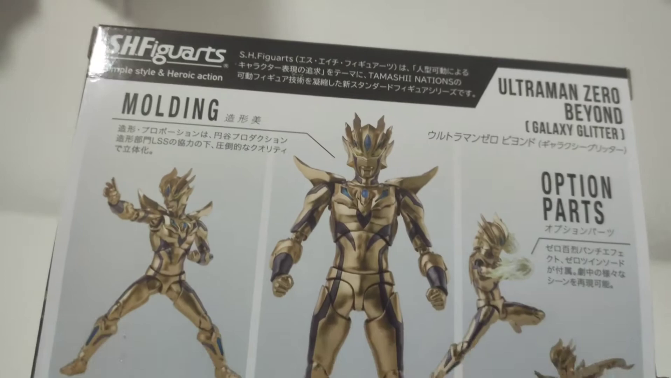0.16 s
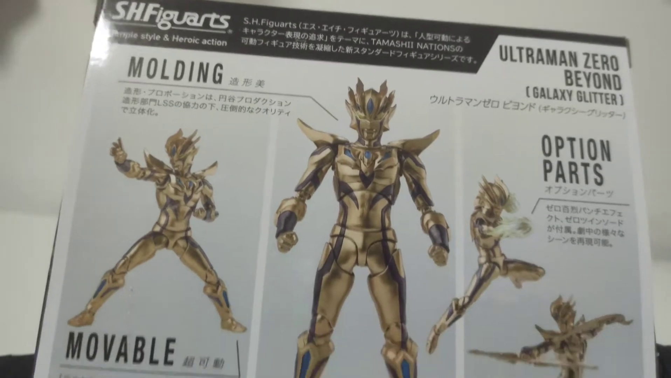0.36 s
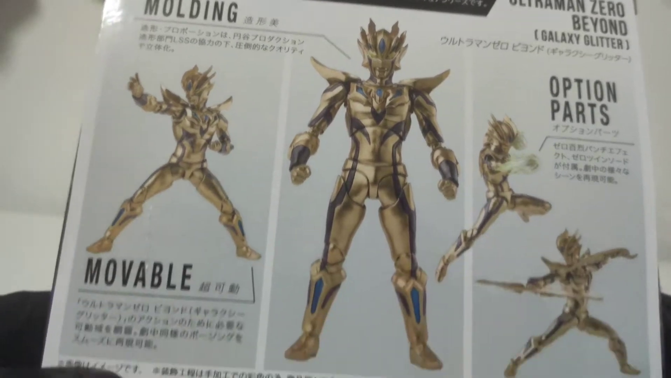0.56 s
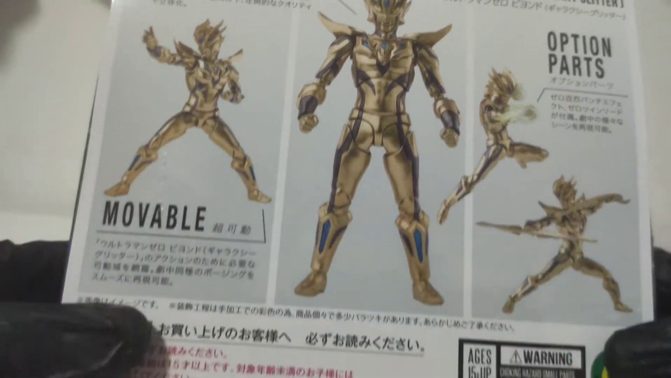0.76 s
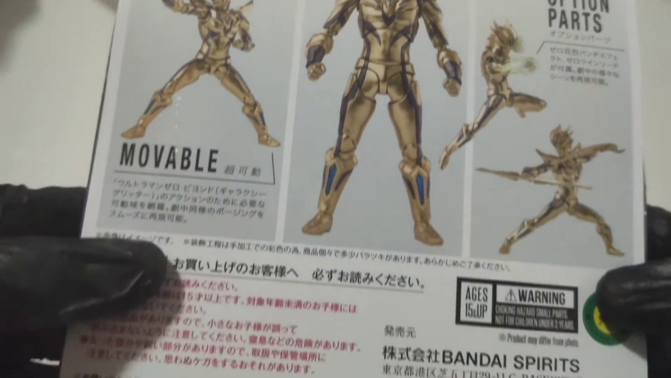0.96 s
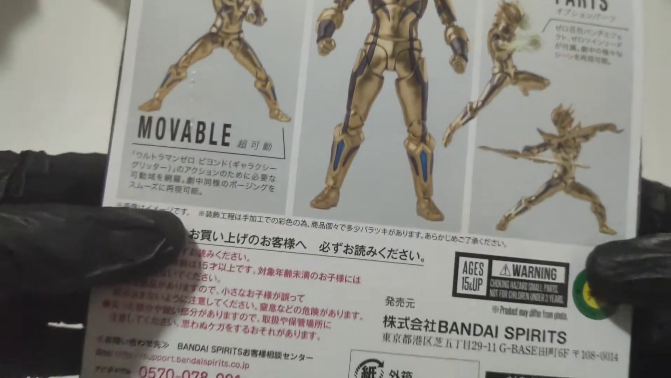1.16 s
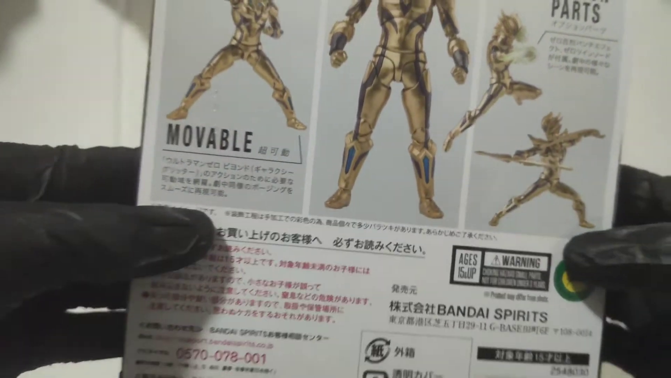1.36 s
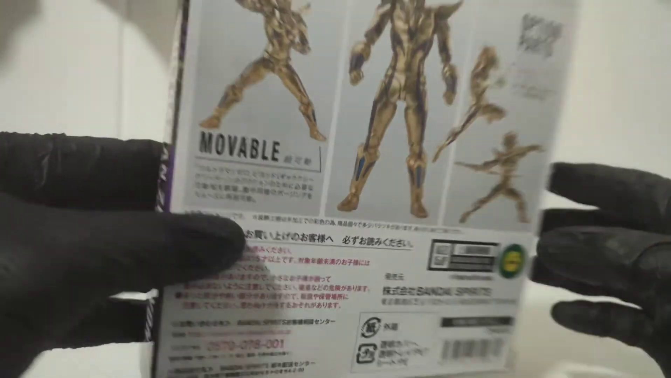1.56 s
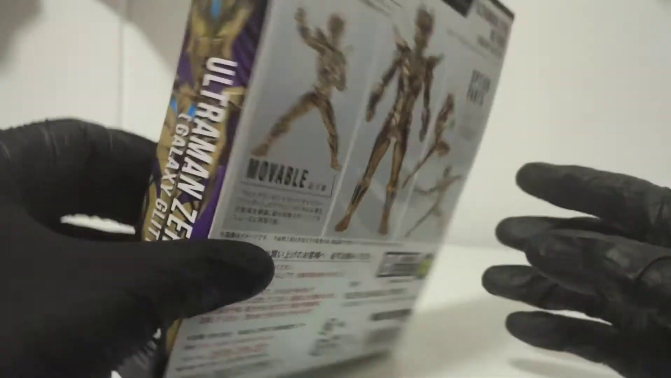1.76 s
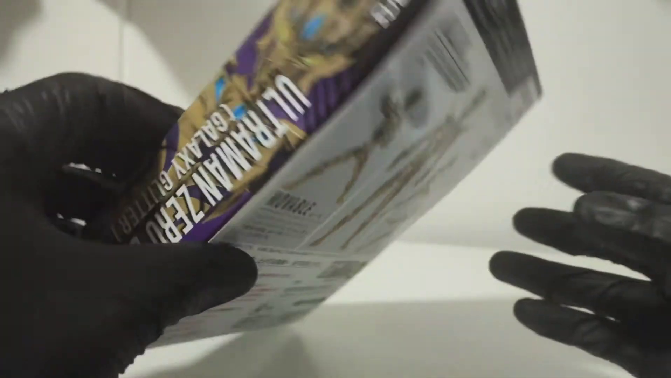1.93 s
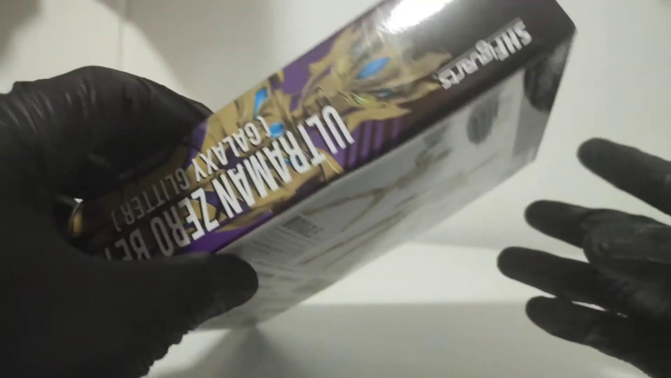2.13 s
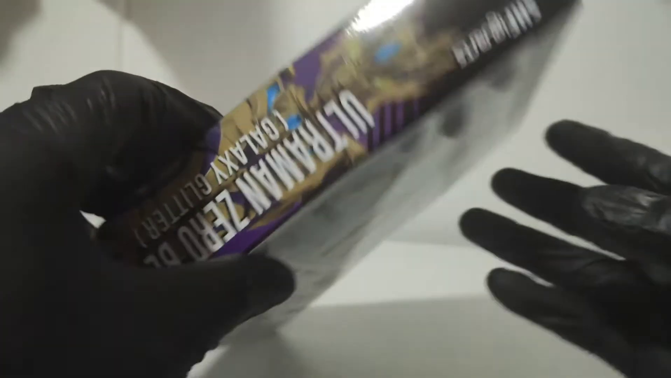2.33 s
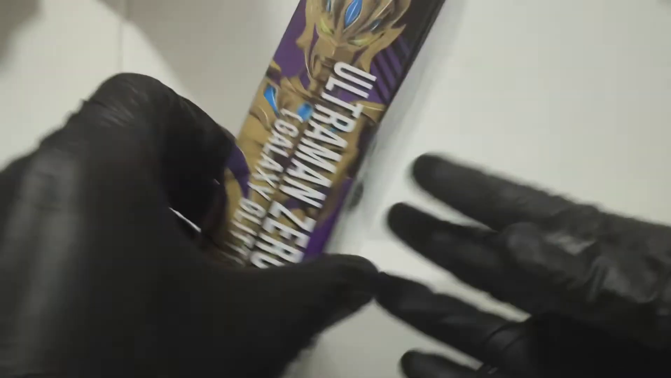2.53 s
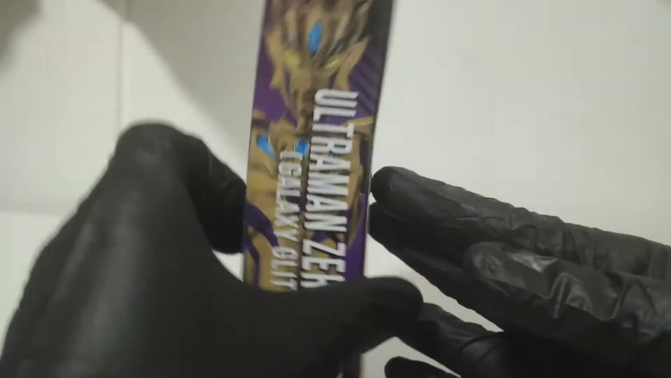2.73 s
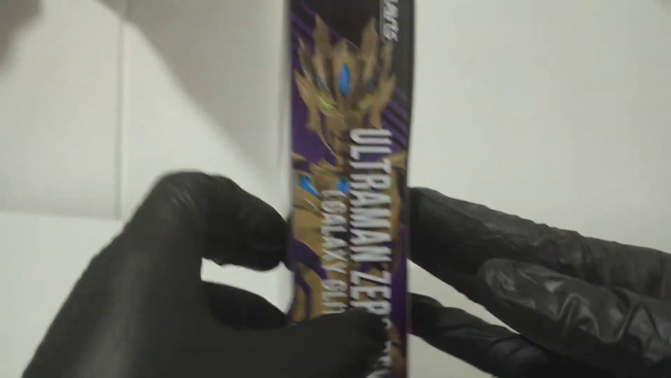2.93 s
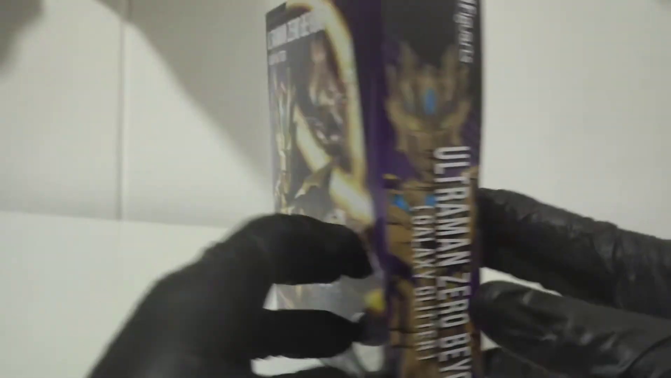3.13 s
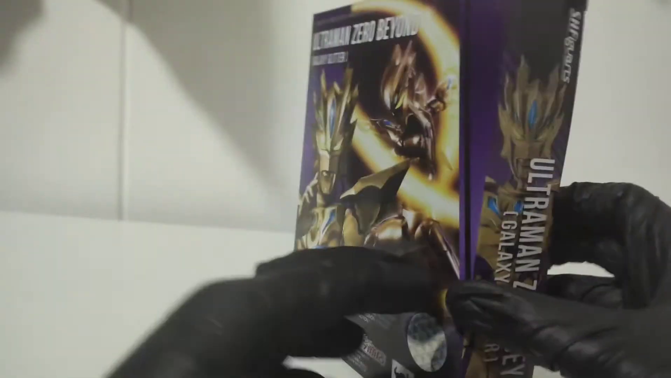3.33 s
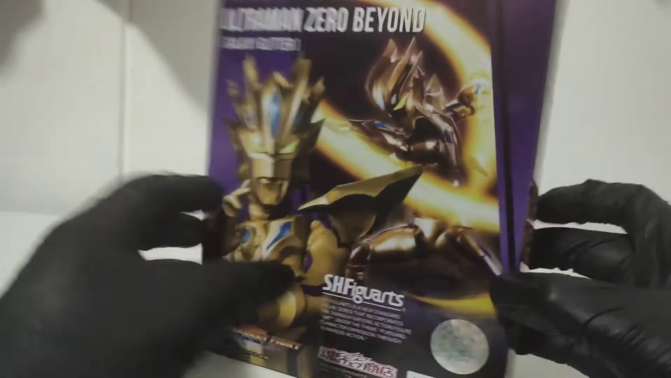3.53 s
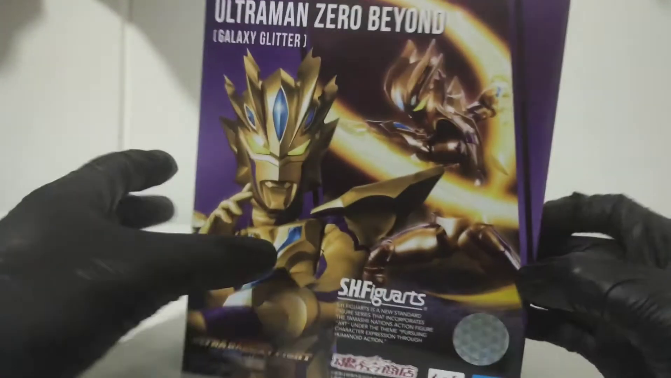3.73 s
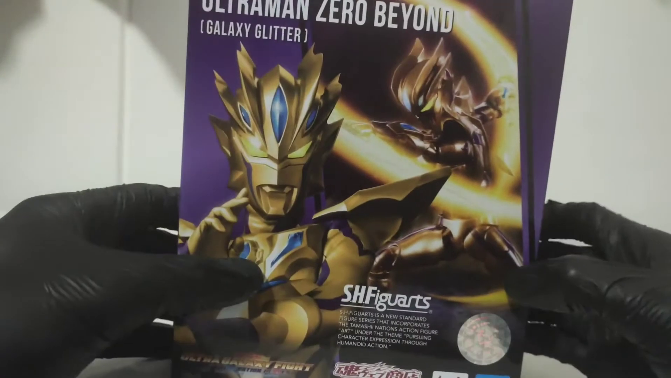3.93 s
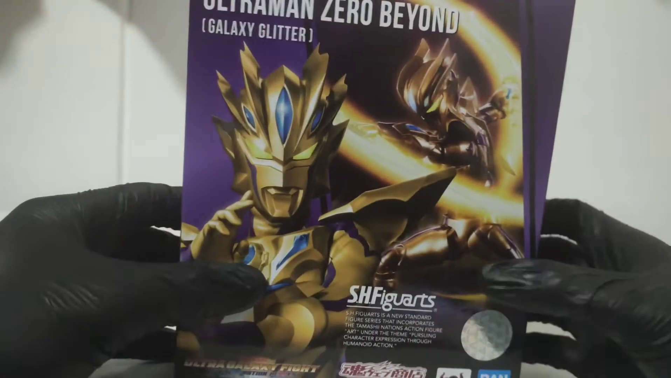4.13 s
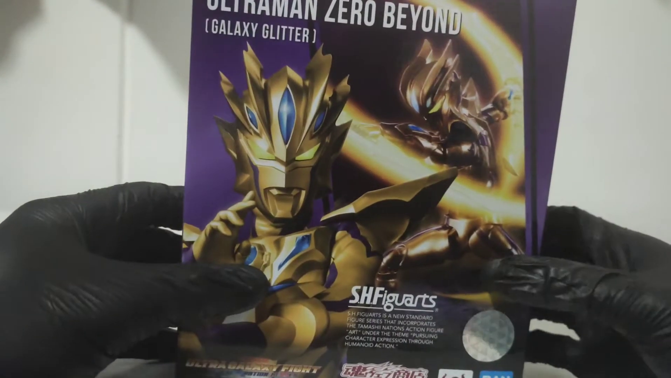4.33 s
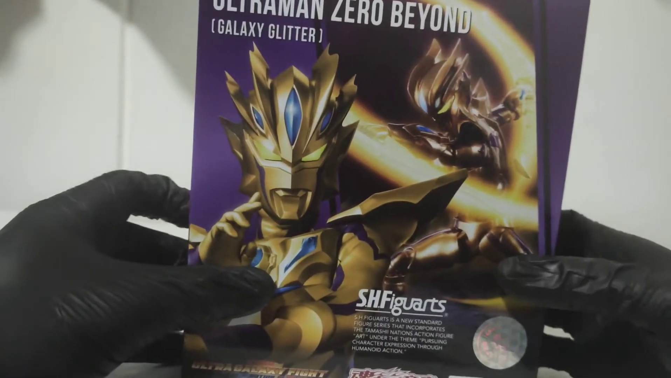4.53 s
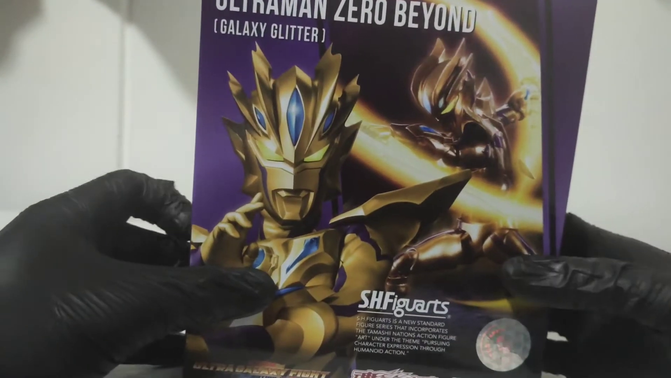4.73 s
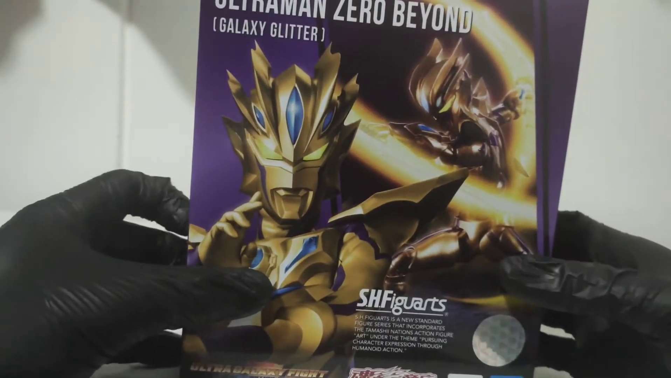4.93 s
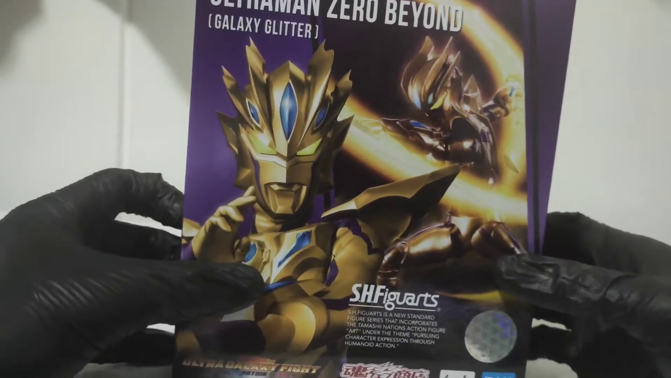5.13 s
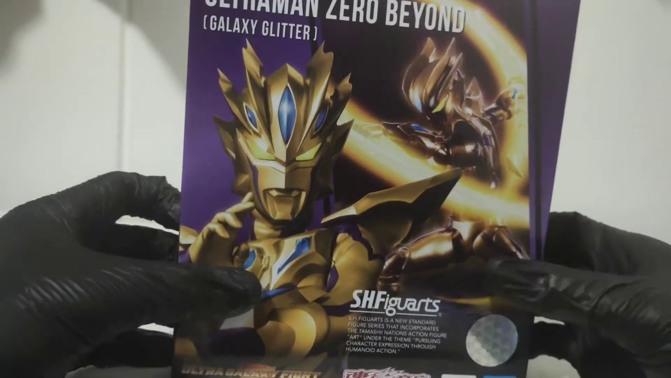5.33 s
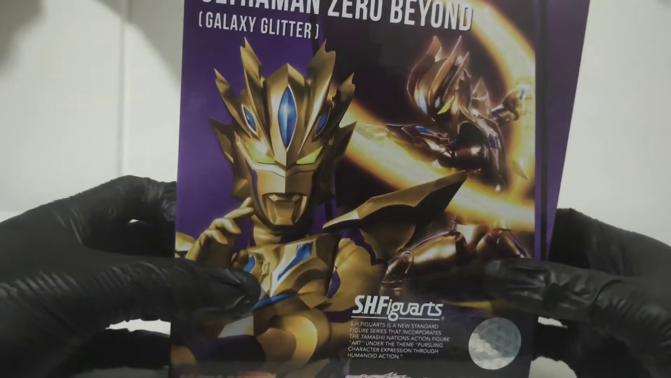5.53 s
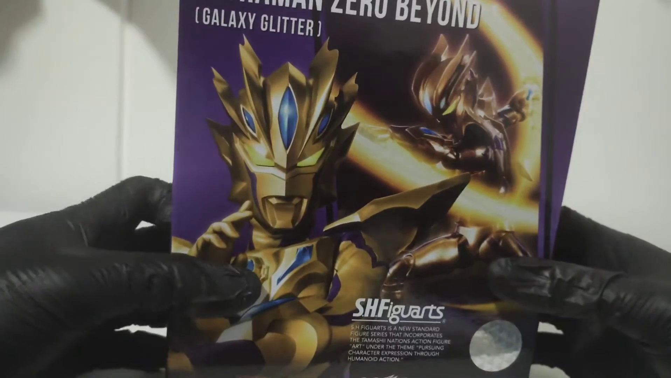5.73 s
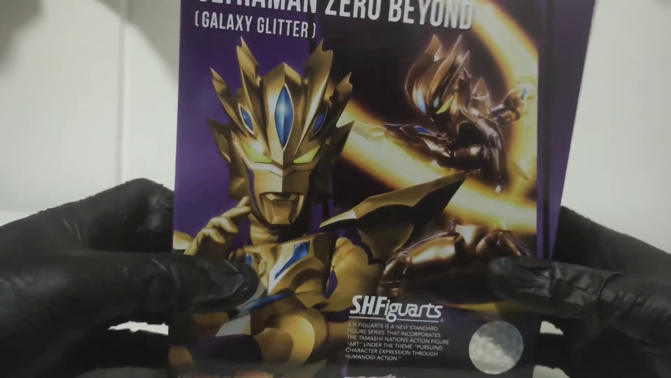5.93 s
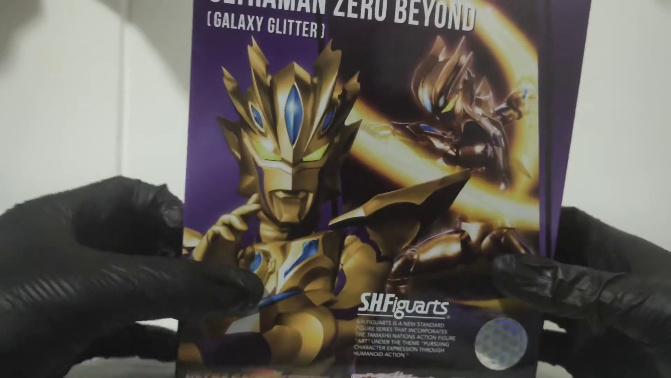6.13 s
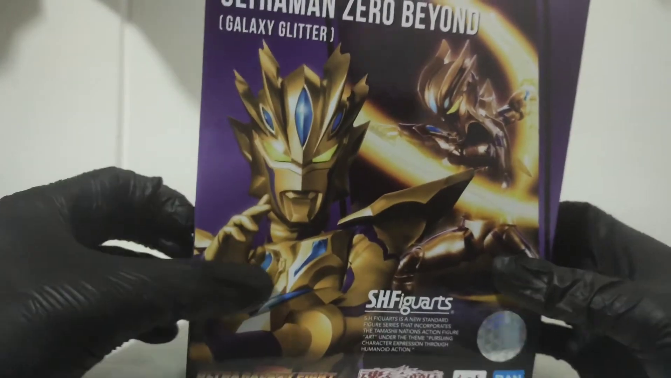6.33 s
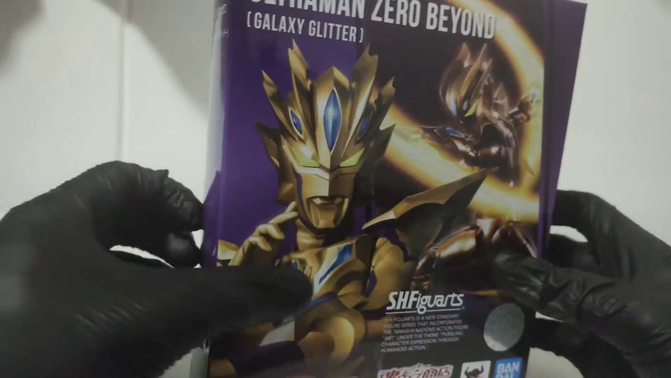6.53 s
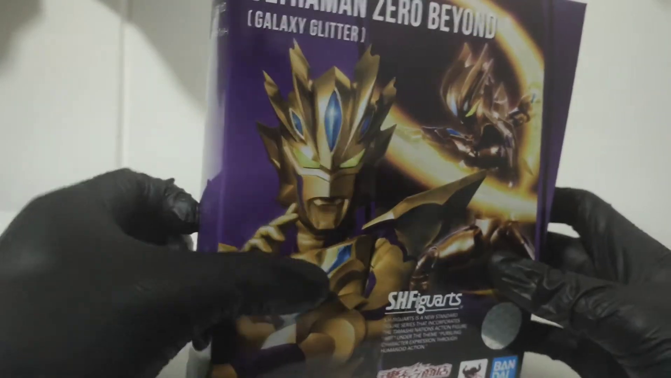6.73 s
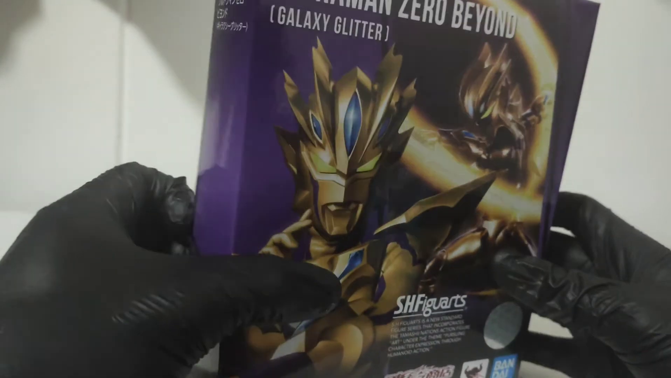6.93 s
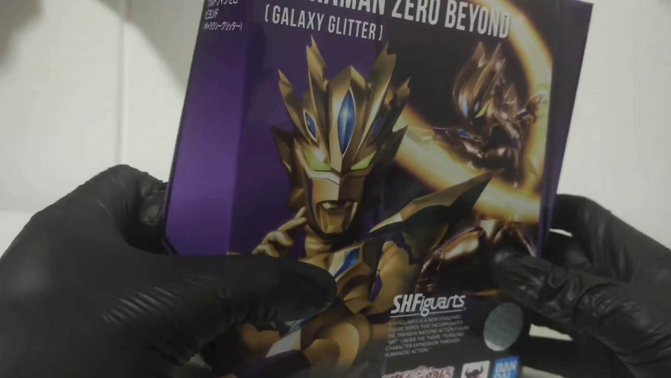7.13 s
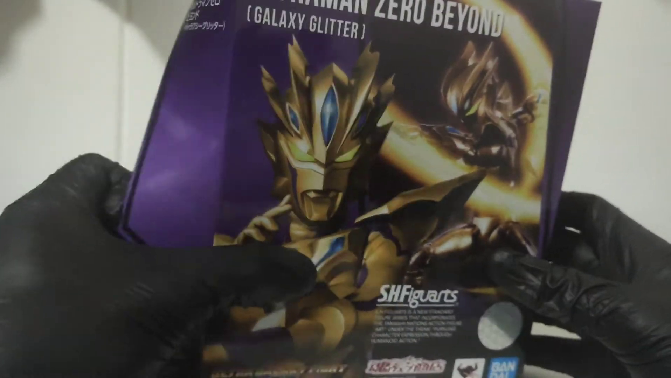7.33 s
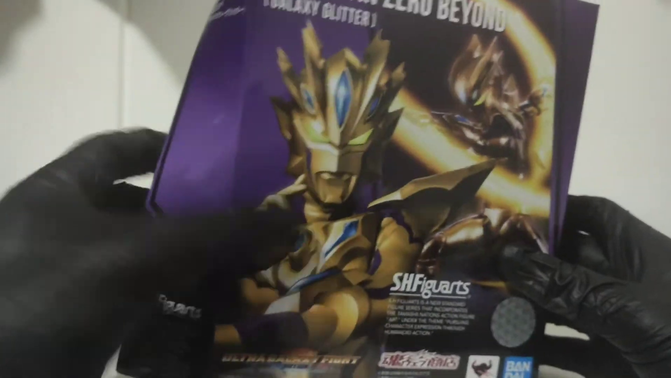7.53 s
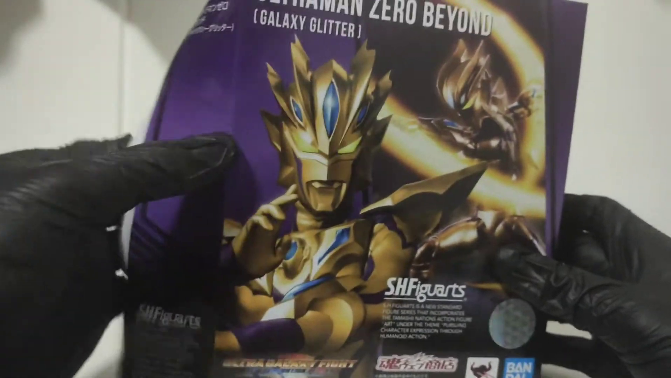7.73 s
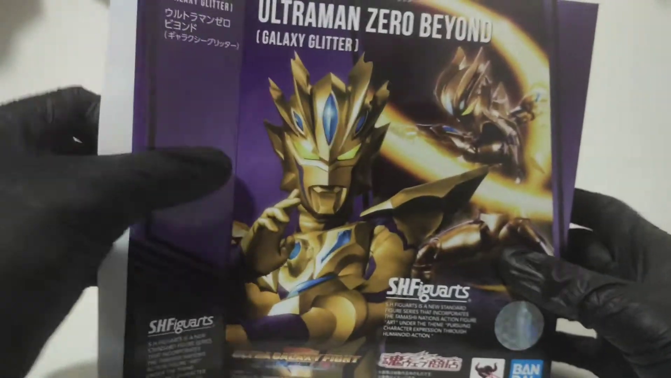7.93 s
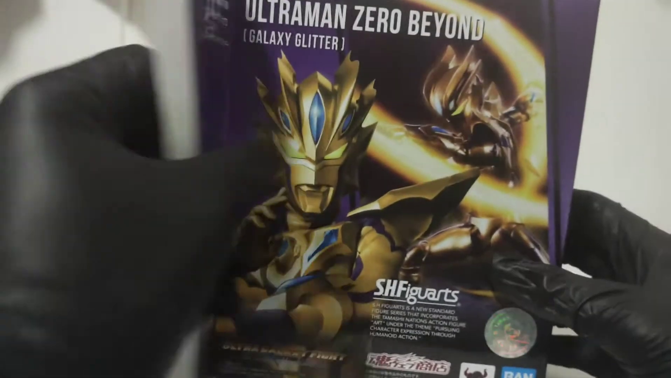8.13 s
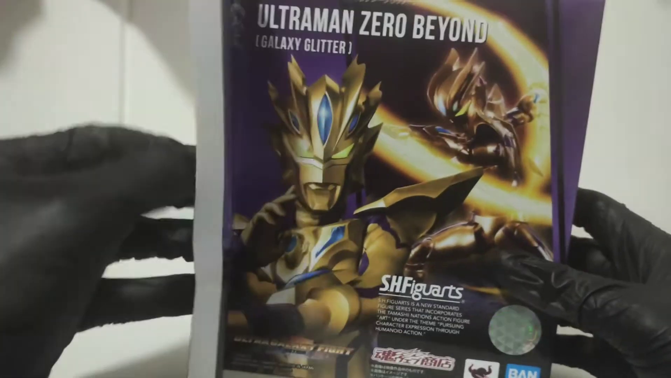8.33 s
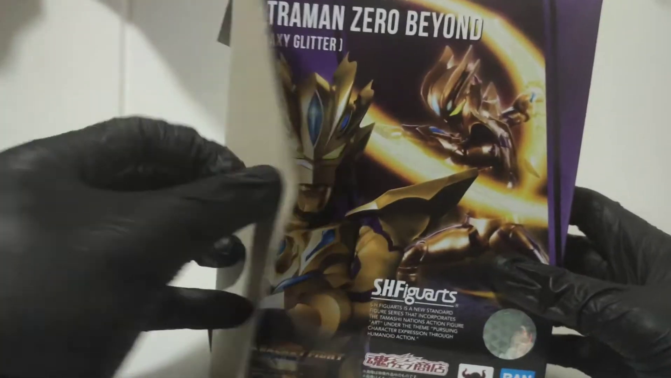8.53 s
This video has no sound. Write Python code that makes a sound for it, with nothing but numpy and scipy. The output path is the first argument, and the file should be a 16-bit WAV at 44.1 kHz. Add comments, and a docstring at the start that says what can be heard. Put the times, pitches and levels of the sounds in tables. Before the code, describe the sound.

A thin hollow cardboard box is handled by gloved hands, close up, in a small bare room with a short echo and faint air noise. The first second is nearly silent. From about 1 to 3 s come faint creaks, small ticks and brief scratchy rubs as the box turns. Around 3.5 s the handling thickens, with a loud hollow knock at 3.6 s and smaller taps until 4. From 4 to 5.9 s it is held, with only sparse light taps and soft rubbing. At 6 s a hard, low double pop bursts out, followed by steady scratchy rubbing to 6.7. From 6.9 to 7.9 s the flap bends in dense crisp pops, sharp at 7.3 and loudest at 7.8 with a soft thump. After a rustling lull, another cluster of pops and glove scratches comes at 8.4 to 8.6 s. Mono, mid-heavy, thin in bass.

```python
"""Opening a thin cardboard box

Gloved hands turn a thin cardboard box and pry open its flap, close by in a small bare room.
Bursts of noise ring the hollow box as pops, knocks and creaks; low bursts make soft thumps.
Rough and ticking noise makes the rubbing card and the gloves that scratch over the glossy print.
A short echo and faint room noise lie behind. The sound is mono, thin in the bass, its peaks limited."""
import sys
import numpy as np
from scipy import signal
from scipy.fft import rfft, irfft, next_fast_len
from scipy.io import wavfile
from scipy.ndimage import uniform_filter1d, minimum_filter1d, map_coordinates

SR = 44100
rng = np.random.default_rng(int(sys.argv[2]) if len(sys.argv) > 2 else 0)


def materialize(psi):
    """Save the field psi as 16-bit PCM at rate SR to the path in sys.argv[1].

    A 1-D psi becomes a single channel; in a 2-D psi each row is a channel.
    """
    bounded = np.clip(np.atleast_2d(psi).T, -1, 1)
    quanta = np.round(bounded * 32767).astype(np.int16)
    wavfile.write(sys.argv[1], SR, quanta)


N = 382347

# Pops and creaks of the card: start_s, level_db, pitch_hz (strongest),
# crack_db (treble against ring, before a common trim), length_ms (kept within 1.5 to 60)
CARD_POPS = [(0.949, -47.5, 1510, -30, 11), (1.513, -40, 550, -13, 27), (1.637, -36.5, 1110, -7, 26),
             (1.73, -34.5, 1150, -7, 35), (1.754, -30.5, 2760, -8.5, 29), (1.881, -31.5, 1170, -1, 24),
             (1.936, -35.5, 1090, -15, 25), (2.12, -31, 1180, -13.5, 24), (2.264, -27, 604, -13, 39),
             (2.337, -19.5, 895, -26, 1.7), (2.446, -32, 1320, 1.5, 45), (2.591, -30, 3260, 10, 3),
             (2.667, -28.5, 1050, -3, 3.8), (2.702, -37.5, 2930, 13.5, 3.3), (2.781, -25, 980, -8.5, 11),
             (3.056, -26.5, 1300, -11, 29), (3.315, -28.5, 2000, -7, 13), (3.364, -26.5, 1300, -16, 21),
             (3.485, -19.5, 1130, -16, 26), (3.571, -16, 1000, -19, 10), (3.599, -2.5, 1170, -10.5, 22.1),
             (3.687, -17, 1056, -25, 1.8), (3.699, -17, 1240, -20, 5.9), (3.771, -12, 940, -12, 3.6),
             (3.798, -12.5, 1200, -16, 7.6), (3.819, -19, 1150, -8, 7.6), (3.91, -26.5, 1020, -17, 7.5),
             (3.96, -20.5, 1080, -44, 2.5), (3.977, -21.5, 1160, -28, 2.1), (4.183, -30.5, 1090, 2.5, 12.5),
             (4.239, -35, 1240, -38, 25), (4.288, -34, 820, -41, 5.6), (4.405, -31.5, 1240, -18, 3.4),
             (4.626, -29, 1097, -32, 4.7), (4.858, -39.5, 784, -41.5, 7.1), (4.876, -32.5, 1036, -15, 6.7),
             (4.998, -21.5, 795, -8, 8.3), (5.266, -37.5, 600, -38, 11), (5.283, -28, 1047, -19, 2.2),
             (5.368, -30.5, 1070, -17, 11.3), (5.452, -39.5, 760, -45, 2.1), (5.531, -36, 830, -32, 18),
             (5.6, -23, 820, -21, 4.8), (5.707, -22.5, 1190, -15.5, 6.8), (5.838, -21.5, 1560, -9, 17),
             (5.878, -24.5, 690, -16, 6.5), (5.998, 3, 600, -8, 16), (6.005, 0, 910, -8, 20.5),
             (6.037, -16.5, 1140, -7, 23), (6.067, -14, 1000, -7, 4), (6.169, -25.5, 1210, -6.5, 5.9),
             (6.186, -23, 2180, -11, 1.3), (6.256, -25, 1090, -16, 5.5), (6.38, -27.5, 1220, -34, 6.3),
             (6.586, -15, 1000, -23, 14), (6.771, -26, 1000, -47, 8.8), (6.788, -19, 1030, -12, 11),
             (6.83, -23, 1110, -12, 9.8), (6.863, -15.5, 1170, -17, 3.3), (6.91, -17, 1060, -5, 2.6),
             (6.925, -3, 1040, -13, 4.9), (7.039, -23, 1140, -4, 7.7), (7.065, -24.5, 1150, -23, 3.7),
             (7.076, -12, 930, -9, 8.9), (7.092, -20, 1280, -12, 1.5), (7.119, -14, 1760, -12, 1.1),
             (7.14, -18, 750, -20, 1.6), (7.178, -15.5, 840, -3, 6.8), (7.19, -6, 940, 0.5, 9.4),
             (7.27, -10.5, 2820, 5, 28.6), (7.321, 3, 1470, 2, 9.5), (7.365, -12.5, 1610, -22, 4.5),
             (7.429, -20, 1710, -3, 26), (7.443, -10.5, 930, -19, 0.82), (7.455, -15, 1360, -13, 6.1),
             (7.464, -11.5, 1820, -2, 4.8), (7.569, -25.5, 1090, -21, 3.2), (7.629, -19.5, 1080, -10.5, 30),
             (7.659, -11, 1900, -4, 17), (7.693, -22, 890, -8, 6.4), (7.712, -18.5, 840, -6, 6.8),
             (7.734, -22, 1120, -6, 6), (7.811, 7.5, 920, -2, 7.9), (7.836, -2, 1800, -9.5, 10),
             (7.869, -10.5, 1100, -7, 22), (7.91, -14.5, 1050, -36, 6.5), (7.928, -16, 1330, -5, 13.6),
             (7.997, -21.5, 1200, -4.5, 10), (8.022, -24.5, 1090, -50, 2), (8.168, -25, 920, -59, 1.6),
             (8.199, -26, 1010, -9, 30), (8.238, -19.5, 1090, -33, 6.5), (8.339, -23, 1090, -18, 5.4),
             (8.378, -22, 930, -26, 5), (8.394, -11, 830, -11, 12), (8.417, -8.5, 694, -11, 8.4),
             (8.428, -11, 1270, -9.5, 19), (8.442, -16, 750, -1.5, 5.3), (8.473, -25.5, 690, -18, 11),
             (8.516, -20, 2160, -13, 4.1), (8.614, -17.5, 1100, -12, 7.3)]
# Ringing panels and air of the box: pitch_hz, width_hz, level_db, flap_change_db (once the flap lifts)
BOX_MODES = [(435.6, 103, -22.5, 5), (607, 91.6, -2.5, 0.5), (835, 122, -2.5, 0), (1002, 117, 0.5, 2),
             (1206, 157, -1.5, 2.5), (1454, 190, -3, -0.5), (1786, 197, -5, 0.5), (2182, 290, -7.5, -0.5),
             (2682, 396, -10.5, 0), (3253, 374, -12.5, 3), (3578, 350, -16, 2)]
# Treble colour of a crack: pitch_hz, level_db (relative, per hertz)
CRACK_COLOUR = [(1500, -120), (2800, 0), (4300, 0.5), (5200, -5.5), (9500, -11), (12500, -16.5),
                (15500, -36)]
# Low colour of moving panels: pitch_hz, level_db (relative, per hertz)
THUMP_COLOUR = [(20, -31), (60, -22.5), (160, -21.5), (260, -1), (350, 4.5), (650, -12), (1500, -93.5)]
# Colour of the glove's scratch: pitch_hz, level_db (relative, per hertz)
GLOVE_COLOUR = [(500, -19.5), (2000, -7), (4500, 3.5), (7000, 0.5), (10400, 0), (12800, -6), (15500, -20)]
# Colour of the quiet room: pitch_hz, level_db (relative, per hertz)
STILL_COLOUR = [(15, -59), (30, -17), (150, -10), (270, -15.5), (375, 1.5), (520, -4.5), (830, -1.5),
                (1250, -6), (1480, 2.5), (1750, -9.5), (3600, -20), (11000, -24), (15500, -46.5)]
# How long the echo takes to fade by 60 dB: pitch_hz, fade_s
ROOM_FADE = [(200, 0.3), (1400, 0.2), (9700, 0.27)]
# The box bumps the table or a big panel flips: start_s, level_db (peak)
BOX_THUMPS = [(2.117, -42), (2.264, -37.5), (2.338, -49), (3.063, -36.5), (3.593, -37), (5.268, -50),
              (5.996, -30), (6.925, -42.5), (7.187, -34.5), (7.323, -28), (7.807, -18), (8.197, -46.5),
              (8.393, -46)]
# Treble loss of the microphone: pitch_hz, level_db
MIC_COLOUR = [(9000, -0.9), (13000, -3.5), (15500, -10)]
# Hands resting on the box, never quite still: start_s, card_rub_db, glove_scratch_db
HAND_GRIP = [(0, -84, -89), (1.17, -72.5, -84), (1.22, -63.5, -70), (1.5, -68, -71), (2.05, -79, -66.5),
             (2.25, -74, -68.5), (2.95, -72, -62), (4.1, -60.5, -64.5), (4.7, -65, -63), (4.8, -73, -77.5),
             (5.249, -69, -76.5), (5.5, -81, -78), (5.97, -71, -74), (6.1, -52.5, -67), (6.5, -48, -57),
             (6.72, -70, -66), (7.55, -57, -53), (8.15, -48.5, -60.5), (8.67, -48, -54)]
# Fingers slide over the card: start_s, hold_s, card_rub_db, glove_scratch_db
FINGER_STROKES = [(0.98, 0.022, -68, -77), (1.296, 0.058, -62.5, -70), (1.562, 0.09, -54, -57.5),
                  (1.764, 0.23, -52.5, -59), (2.13, 0.018, -51.5, -65.5), (2.42, 0.023, -39, -54.5),
                  (2.55, 0.13, -48, -52.5), (2.794, 0.019, -39.5, -53), (3.075, 0.075, -48, -51.5),
                  (3.238, 0.22, -44.5, -53.5), (3.522, 0.061, -37.5, -49.5), (3.674, .15, -38, -55.5),
                  (3.908, 0.043, -46, -54), (4.172, 0.078, -50, -64), (4.356, 0.28, -51, -63),
                  (4.864, 0.22, -60.5, -73), (5.306, 0.098, -57, -70), (5.54, 0.34, -49, -63),
                  (6.56, 0.039, -41.5, -55.5), (6.814, 0.044, -40, -60), (7.097, 0.026, -36, -58),
                  (7.265, 0.026, -31.5, -49), (7.437, 0.027, -30.5, -54), (7.512, 0.017, -53, -48.5),
                  (7.672, 0.2, -35.5, -53), (8.207, .04, -54, -45.5), (8.294, 0.015, -47, -44.5),
                  (8.332, 0.015, -59, -46.5), (8.4, 0.058, -31.5, -46), (8.637, 0.026, -37, -51.5)]
# How fast a stroke dies, the card first, then the glove, which stops sooner: fall_db_per_s
STROKE_FALL = [
    [138],
    [258],
]

FLAP_S = 5.9  # the flap starts to lift
STROKE_RISE_DB_PER_S = 268.5  # a stroke gathers
# after a pop the card rustles back into place
SETTLE_CARD_DB, SETTLE_GLOVE_DB, SETTLE_FALL_DB_PER_S = -26.5, -50.5, 187
STILL_DB = -68.5  # middle level of the quiet room
TOP_HZ = 15795  # nothing is kept from here up


def pops():
    """Each pop is a short run of slips; it rings the modes near its pitch and cracks in the treble."""
    out = np.zeros(N + SR)
    t = np.arange(SR // 10) / SR
    modes_hz = np.transpose(BOX_MODES)[0][:, None]
    for start_s, level_db, pitch_hz, crack_db, length_ms in CARD_POPS:
        u = t * 1000 / np.clip(length_ms, 1.5, 60)  # time in pop lengths
        stroke = (1 - np.exp(-u / 0.051)) * amp(-6 * u - 4.2 * u * u)  # the run holds, then stops
        # neighbouring samples share a strength, in clumps of 48
        strengths = amp(2.5 * rng.exponential(size=len(t) // 48 + 1))
        clumps = np.repeat(strengths, 48)[:len(t)]
        ring_slips, crack_slips = rng.standard_normal((2, len(t))) * clumps * stroke

        octaves_away = np.abs(np.log2(modes_hz / pitch_hz))
        lift_db = rng.normal(0, 1.24, modes_hz.shape) - 3 * octaves_away
        # a crisper snap reaches the upper modes too
        upper = np.clip(np.log2(modes_hz / 1300), 0, 1)
        lift_db = lift_db + 0.58 * (crack_db + 13.5) * upper
        stretch = 1 + rng.normal(0, 0.036, modes_hz.shape)

        ring = filtered(ring_slips, lambda hz: box(hz, lift_db, stretch, start_s > FLAP_S))
        crack = coloured(crack_slips, CRACK_COLOUR)
        pop = peak(ring) + amp(crack_db - 7.0) * peak(crack)
        out[round(start_s * SR):][:len(t)] += amp(level_db - 0.5) * pop
    return out[:N]


def box(hz, lift_db=0, stretch=1, flap_up=False):
    """How the hollow box rings at each pitch: a sum of modes, each lifted and detuned by the grip."""
    mode_hz, width_hz, level_db, flap_db = np.transpose(BOX_MODES)[..., None]
    sign = (-1.) ** np.arange(len(BOX_MODES))[:, None]  # neighbours push in opposite directions
    gain = sign * amp(level_db + flap_up * flap_db + lift_db)
    damping = 1j * hz * width_hz
    return np.sum(gain * damping / ((mode_hz * stretch) ** 2 - hz * hz + damping), axis=0)


def thumps():
    """A bump or flipping panel pushes air: a soft low noise burst that swells fast and fades within a tenth of
    a second."""
    out = np.zeros(N + SR)
    t = np.arange(SR // 8) / SR
    for start_s, level_db in BOX_THUMPS:
        swell = 1 - np.exp(-t / 0.0024)
        fade = amp(-60 * t / 0.084)
        push = rng.standard_normal(len(t)) * swell * fade
        out[round(start_s * SR):][:len(t)] += amp(level_db) * peak(coloured(push, THUMP_COLOUR))
    return out[:N]


def hands():
    """Fingers drag on the card in fits and starts and make it tick; the gloves scratch in the treble."""
    card_gain, glove_gain = contact()
    t = np.arange(N) / SR
    fits = wobble(30)  # shared by card and glove

    drag = unit(amp(2.16 * fits + 1.7 * wobble(90)) * gritty(spike_db=2.0))
    drag = drag + amp(-5) * ticking(rate=78, fade_s=0.0073)
    shut = unit(filtered(drag, lambda hz: box(hz, flap_up=False)))
    lifted = unit(filtered(drag, lambda hz: box(hz, flap_up=True)))
    card = patchy(np.where(t < FLAP_S, shut, lifted), depth_db=2.0)
    # the big panels move a little air
    card = card + amp(-24.0) * unit(coloured(rng.standard_normal(N), THUMP_COLOUR))

    rub = unit(amp(2.2 * fits + 1.5 * wobble(100)) * gritty(spike_db=0.5))
    rub = rub + amp(-8.0) * ticking(rate=160, fade_s=0.0035)
    glove = patchy(coloured(rub, GLOVE_COLOUR), depth_db=3.0)
    return card_gain * card + glove_gain * glove


def contact():
    """Levels of card and glove: the grip, the strokes and the settling after each pop add up as power."""
    t = np.arange(0, N / SR + .01, .002)  # a level every 2 ms is enough
    grip_s, *grip_db = np.transpose(HAND_GRIP)
    power = amp([np.interp(t, grip_s, db) for db in grip_db]) ** 2
    for start_s, hold_s, *stroke_db in FINGER_STROKES:
        before_s = np.maximum(start_s - t, 0)
        after_s = np.maximum(t - start_s - hold_s, 0)
        loss_db = STROKE_RISE_DB_PER_S * before_s + np.array(STROKE_FALL) * after_s
        power = power + amp(np.c_[stroke_db] - loss_db) ** 2
    for start_s, level_db, _, crack_db, _ in CARD_POPS:
        settle_db = np.c_[[level_db + SETTLE_CARD_DB, level_db + crack_db + SETTLE_GLOVE_DB]]
        fall_db = SETTLE_FALL_DB_PER_S * np.abs(t - start_s)
        power = power + (t > start_s) * amp(settle_db - fall_db) ** 2
    return [np.interp(np.arange(N) / SR, t, np.sqrt(p)) for p in power]


def gritty(spike_db):
    """Noise of uneven small slips: most samples are small, a few are large."""
    return unit(rng.standard_normal(N) * amp(spike_db * rng.exponential(size=N)))


def ticking(rate, fade_s):
    """Sparse tiny slips of uneven size, rate a second on average, each a fading burst of noise."""
    sizes = amp(6.0 * np.minimum(rng.exponential(size=N), 2.5))
    hits = (rng.random(N) < rate / SR) * sizes
    fade = amp(-60 * np.arange(SR // 50) / SR / fade_s)
    return unit(signal.fftconvolve(hits, fade)[:N] * rng.standard_normal(N))


def room(x):
    """Each frequency dies at its own speed; a new tail for every quarter second, as the box moves."""
    out = np.zeros(N + SR)
    step = SR // 4
    for start in range(0, N, step):
        hz, t, cells = signal.stft(rng.standard_normal(SR // 3), SR, nperseg=256)
        fade = amp(-60 * t / along(ROOM_FADE, hz)[:, None])
        tail = signal.istft(cells * fade, SR, nperseg=256)[1]
        wet = signal.fftconvolve(x[start:start + step], tail / np.linalg.norm(tail))
        out[start + SR // 200:][:len(wet)] += wet  # the echo starts 5 ms late
    return out[:N]


def stillness():
    """Faint room air and far rumble: coloured noise with a wavering level."""
    air = patchy(coloured(rng.standard_normal(N), STILL_COLOUR), depth_db=4.0)
    return amp(STILL_DB + 1.6 * wobble(3.5)) * air


def amp(db):
    """Decibels to a plain multiplier."""
    return 10 ** (np.asarray(db) / 20)


def unit(x):
    """Scaled to an average (rms) strength of one."""
    return x / np.sqrt(np.mean(x ** 2) + 1e-20)


def peak(x):
    """Scaled to a peak of one."""
    return x / np.abs(x).max()


def along(points, hz):
    """Reads a value between (pitch_hz, value) points, on a log pitch axis."""
    point_hz, values = np.transpose(points)
    return np.interp(np.log(hz + 1), np.log(point_hz + 1), values)


def wobble(rate):
    """A smooth random curve through rate random points a second."""
    return map_coordinates(rng.standard_normal(int(N * rate / SR) + 4), [np.arange(N) * rate / SR])


def filtered(x, response):
    """Multiplies the spectrum of x by a response to frequency."""
    m = next_fast_len(x.shape[-1] + SR // 4)  # spare room for the ringing
    return irfft(rfft(x, m) * response(np.fft.rfftfreq(m, 1 / SR)), m)[..., :x.shape[-1]]


def coloured(x, spectrum):
    """Shapes x by (pitch_hz, level_db) points."""
    return filtered(x, lambda hz: amp(along(spectrum, hz)))


def patchy(x, depth_db):
    """Makes x louder and softer in random patches of time and pitch."""
    cells = signal.stft(x, nperseg=512)[2]
    field = uniform_filter1d(rng.standard_normal(cells.shape), size=4, axis=0)  # smooth over pitch
    field = uniform_filter1d(field, size=6, axis=1)  # smooth over time
    return unit(signal.istft(cells * amp(depth_db * unit(field)), nperseg=512)[1][:N])


def scene():
    """Knocks with their echo, hands and quiet room; both channels carry the same sound."""
    knocks = pops() + thumps()
    mono = knocks + amp(-8.0) * room(knocks) + hands() + stillness()
    return np.array([mono, mono])


def record(dry):
    """The microphone fades at the top; a fast limiter holds the peaks at full scale; a steep band limit."""
    dry = coloured(dry, MIC_COLOUR)
    need = np.minimum(1, 1 / (np.abs(dry).max(axis=0) + 1e-9))
    # turn down around each peak for 10 ms, then smooth over 5 ms
    gain = uniform_filter1d(minimum_filter1d(need, size=SR // 100), size=SR // 200)
    return filtered(dry * gain, lambda hz: hz < TOP_HZ)


dry = scene()
out = record(dry)
materialize(out)
```